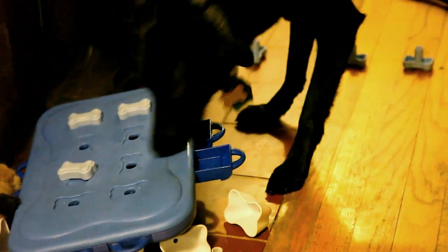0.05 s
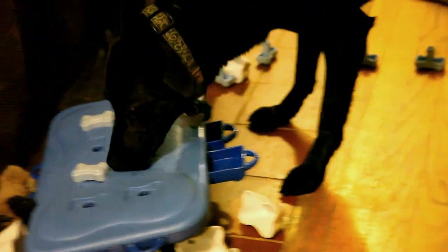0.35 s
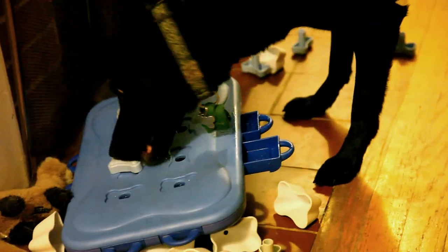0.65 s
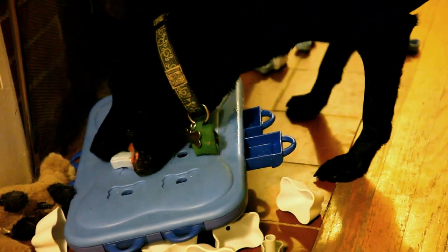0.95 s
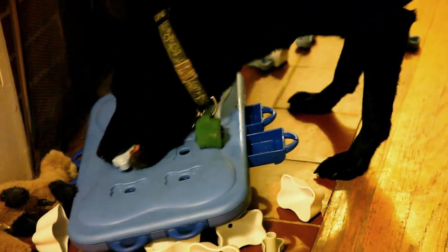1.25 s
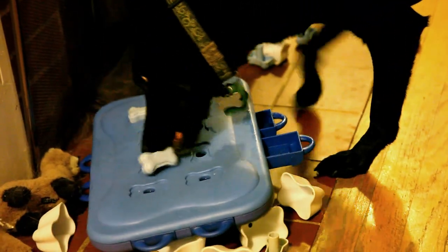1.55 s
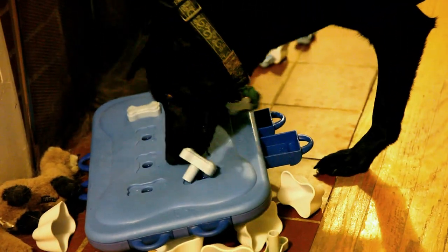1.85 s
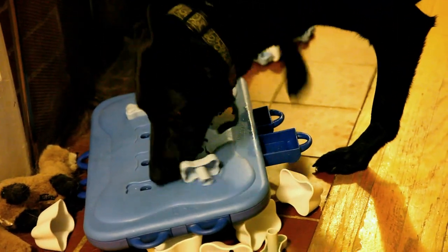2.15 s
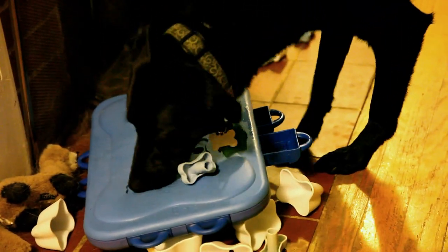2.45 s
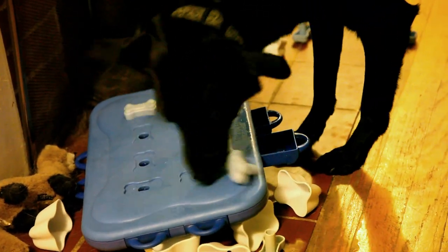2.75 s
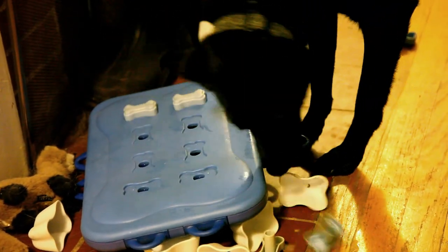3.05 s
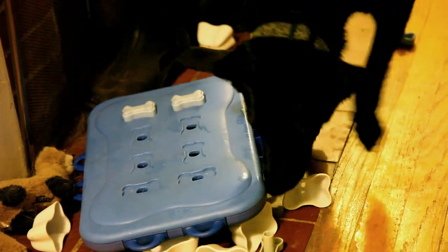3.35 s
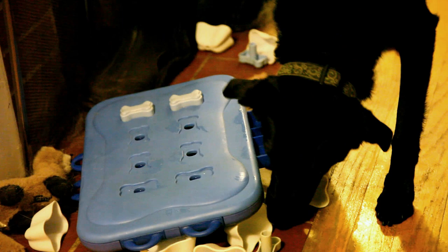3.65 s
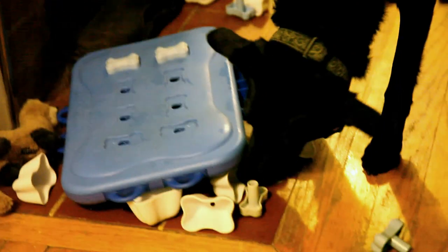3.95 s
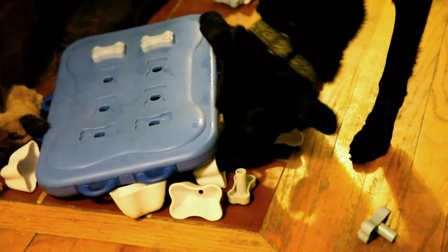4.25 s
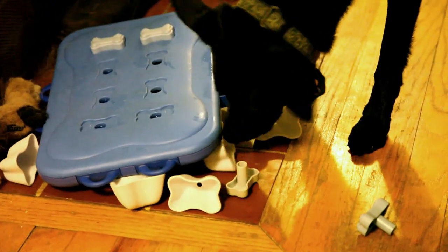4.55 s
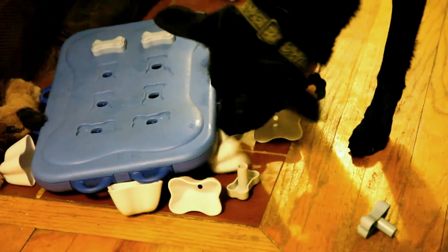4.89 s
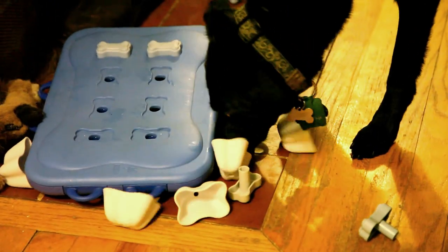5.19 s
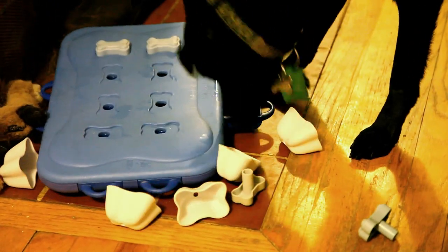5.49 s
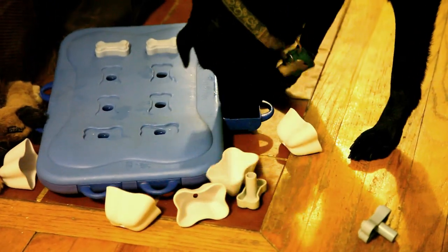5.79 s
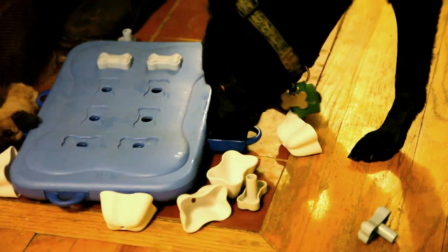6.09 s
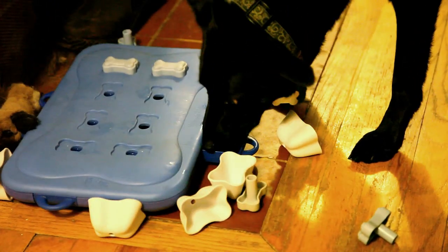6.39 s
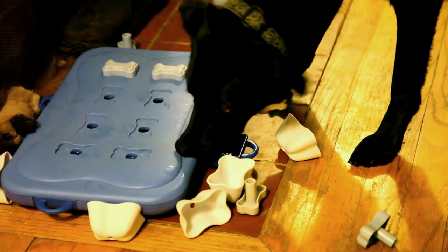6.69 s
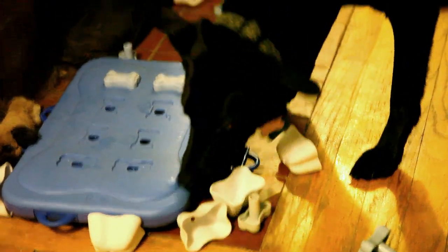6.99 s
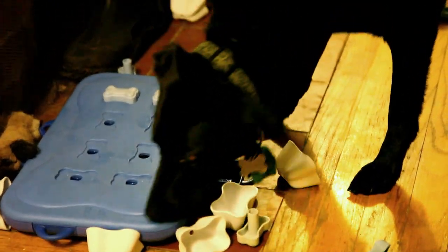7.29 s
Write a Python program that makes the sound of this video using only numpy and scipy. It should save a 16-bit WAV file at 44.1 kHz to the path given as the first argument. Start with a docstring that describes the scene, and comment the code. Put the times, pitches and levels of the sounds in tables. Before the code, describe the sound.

Hard plastic pieces clack, snap and rattle in uneven bursts as a dog pushes a toy tray around indoors, sniffing between shoves.

```python
"""Dog at a treat puzzle

A dog noses a hollow plastic puzzle on a wooden floor in a small room. Loose pieces clack, pegs snap
out, one drops and bounces, the tray thuds and scrapes, a cup judders; the dog sniffs between pushes.
Hiss, motor whirr, hum and a thin whine lie underneath. The gain ducks at the loudest knocks."""
import sys
import numpy as np
from scipy import signal
from scipy.fft import rfft, irfft
from scipy.io import wavfile
from scipy.ndimage import uniform_filter1d

SR = 44100
rng = np.random.default_rng(int(sys.argv[2]) if len(sys.argv) > 2 else 0)


def store_pcm(level_fs):
    """Save levels as 16-bit WAV."""
    pcm = np.round(np.clip(level_fs, -1, 1) * 32767).astype(np.int16)
    wavfile.write(sys.argv[1], SR, np.atleast_2d(pcm).T)


N = 332073
TIME = np.arange(N) / SR

# hollow tray modes: f/Hz, level/dB, t60/s
TRAY_MODES = [(165, -5.5, 0.33), (301.4, -0.5, 0.079), (342, -5.5, .05), (421, 1.5, 0.095),
              (460, -2.5, 0.039), (548, -4.5, 0.04), (601, -6.5, 0.069), (666, 3.5, 0.031),
              (758, -1, 0.052), (828, 6, 0.028), (1008, 0.5, 0.068), (1106, 3, 0.023)]
# peg modes: f/Hz, level/dB, t60/s
PEG_MODES = [(1965, 0.5, 0.0049), (2330, 3, 0.014), (2560, -2.5, 0.016), (3370, -4.5, 0.006)]
# pushes on the tray: start/s, peak/s, end/s, relative level/dB, tilt/(dB/octave)
TRAY_SHOVES = [(0.771,0.825,1.05,-46.5,6.5),(.98,1.15,1.93,-34,-3),(1.548,1.563,1.64,-17,-2.5),(1.622,1.64,1.782,-16.5,-2.5),(1.897,1.955,2.05,-26,-2),(2.22,2.317,2.41,-27,-2),(2.719,2.828,2.97,-29.5,-1),(2.931,3.005,3.01,-27.5,0.5),(4.102,4.201,4.31,-30,-1.5),(4.32,4.384,4.45,-34,-3),(4.454,4.47,4.5,-30,2.5),(4.817,4.841,4.927,-24.5,-4.5),(5.001,5.11,5.37,-31,-2.5),(5.163,5.241,5.42,-21.5,-1),(5.48,5.6,5.77,-33,1),(6.179,6.225,6.29,-15,-1.5),(6.82,6.835,6.85,-38,-10),(7.032,7.068,7.19,-40,3)]


def knocks(ring_cycles=38, chatter=0.29, rebound_db=-13, band_ratio=1.54, room_db=-1):
    """Snap, chatter and a weak rebound ring a piece and thump the tray. Returns direct, room feed."""
    # main contacts: t/s, clack/dB, f/Hz, relative thud/dB, crack/dB
    contacts = [(1.1042,-26.5,2220,-28,-35.5),(1.3716,-23,2420,-38,-32),(1.3867,-22,3150,-26,-33),(1.5546,-19.5,1670,-29,-28),(1.582,-11,1620,-31,-21),(1.627,-9,3520,-11.5,-20),(1.6303,-8,1420,-14.5,-16),(1.695,-11.5,2180,-32,-19.5),(1.8398,-16.5,2180,-23.5,-28),(1.9051,-18,2110,-26,-27.5),(1.9161,-14.5,1260,-31,-40),(1.9878,-16.5,1370,-24.5,-33.5),(2.1196,-15.5,1500,-23,-25),(2.2062,-22.5,1690,-29,-44),(2.2618,-20.5,1310,-29.5,-52),(2.292,-21,2180,-25,-43),(2.7741,-19.5,1754,-28.5,-38),(2.7796,-20,2650,-47,-33),(2.8376,-18.5,1800,-32,-32),(2.9473,-17,2120,-28,-24.5),(3.0004,-18,2000,-28,-37),(3.0375,-7,2990,-31.5,-29),(3.1505,-20,1500,-45,-27),(3.176,-18,3550,-58,-21),(4.103,-37,3570,-55.5,-42),(4.179,-29.5,1361,-30,-55),(4.3865,-33.5,1500,-37,-55),(4.4908,-18,2370,-55,-41),(4.5592,-23,2560,-37,-34),(4.7013,-23.5,2290,-32.5,-30.5),(4.7415,-30.5,3200,-46,-55),(4.7765,-29.5,3180,-38,-46),(4.8122,-21,2975,-31,-30.5),(4.825,-18.5,1670,-25,-34),(5.079,-23.5,1270,-24.5,-49),(5.184,-17,1300,-34,-35),(5.2805,-17.5,1710,-21.5,-30),(5.3008,-9.5,1970,-29.5,-45),(6.0872,-12.5,1690,-31,-42),(6.0935,-8.5,1680,-42,-19),(6.15,-13.5,1960,-25.5,-44),(6.1824,-7,1606,-10.5,-16),(6.2248,-11.5,2514,-15,-19),(6.313,-18,2510,-37,-50),(7.037,-27.5,3030,-46,-42)]
    direct, feed = np.zeros(N), np.zeros(N)
    t = np.arange(SR // 8) / SR
    for start_s, clack_db, hz, thud_db, crack_db in list(contacts) + bounces() + rattles():
        t60 = ring_cycles / hz  # small pieces die sooner
        noise = rng.standard_normal((3, len(t)))
        since_rebound_s = t - rng.uniform(0.0055, 0.02)
        rebound = (since_rebound_s > 0) * from_db(rebound_db - 60 * np.abs(since_rebound_s) / t60)
        fade = from_db(-60 * t / t60) + rebound
        piece_force, tray_force, edge_force = (t == 0) + chatter * noise * fade
        piece = unit_onset(band(piece_force, hz / band_ratio, hz * band_ratio ** 0.8, order=3))
        broad = unit_onset(band(tray_force, 1090, 4260, order=3))
        clack = from_db(clack_db) * unit_onset(piece + from_db(-6) * broad)
        low_hz = np.clip(330 * 2 ** (-(thud_db + 20) / 16), 315, 700)  # heavy blows move lower modes
        tray = band(body(tray_force, TRAY_MODES, spread_db=3.5), low_hz, 1400, order=3)
        sound = clack + from_db(crack_db) * crack(edge_force) + from_db(thud_db - 1) * unit_onset(tray)
        add(direct, start_s, sound)
        add(feed, start_s, from_db(room_db) * sound)
    return direct, feed


def bounces(start_s=3.1622, flight_s=0.0905, restitution=0.835, first_db=-10.5, loss_db=5.5):
    """Knock rows for a dropped peg: one end lands, then the other, ever sooner and weaker."""
    rows = []
    for k in range(6):
        for lag_s, end_db, hz in (0, 0, 3500), (0.025, -4.5, 2600):
            db = first_db - loss_db * k + end_db
            rows.append((start_s + lag_s, db, hz, db - 20, db - 14.5))
        start_s += flight_s * restitution ** k
    return rows


def rattles(rate_per_s=24, centre_hz=1800, spread_octaves=0.59, edge_db=-9, spread_db=3):
    """Knock rows for loose pieces jostled at random, strongest at the peak of each shove."""
    rows = []
    for start_s, peak_s, end_s, shove_db, _ in TRAY_SHOVES:
        for k, (jitter, size, pitch) in enumerate(rng.uniform(-1, 1, (20, 3))):
            at_s = start_s + (k + 0.5 + jitter / 2) / rate_per_s
            swell_db = np.interp(at_s, [start_s, peak_s, end_s], [edge_db, 0, edge_db])
            db = shove_db + swell_db + spread_db * size
            hz = centre_hz * 2 ** (spread_octaves * pitch)
            if at_s < end_s:
                rows.append((at_s, db - 2.5, hz, db - 9, db - 13.5))
    return rows


def peg_snaps(release_s=0.00089, pop=3.5):
    """Stick-slip grows until a peg pops out of its hole. Returns direct, room feed."""
    # t/s, level/dB, build-up/s, crack/dB, room feed/dB
    snaps = [(1.1761, -12, 0.0029, -31, -9), (1.184, -28, 0.00061, -50, -9), (1.209, 0.5, 0.0034, -12, -7),
             (1.2969, -11.5, 0.00087, -35, -14), (1.301, -11.5, .0008, -38, -5.5),
             (1.309, -11.5, .0006, -42, -8)]
    direct, feed = np.zeros(N), np.zeros(N)
    t = np.arange(SR // 20) / SR
    for start_s, db, build_s, crack_db, room_db in snaps:
        grip = np.minimum(t / build_s, 1) * np.exp(-np.maximum(t - build_s, 0) / release_s)
        slips = grip * rng.standard_normal(len(t))
        slips[np.argmax(grip)] += pop
        peg = unit_onset(band(body(slips, PEG_MODES), 1700, 4600))
        sound = from_db(db) * peg + from_db(crack_db) * crack(slips)
        add(direct, start_s, sound)
        add(feed, start_s, from_db(room_db) * sound)
    return direct, feed


def crack(force, skirt_db=-19):
    """Bright edge of a hard contact, with a weak, wider skirt."""
    edge = unit_onset(band(force, 4800, 7600))
    skirt = unit_onset(band(force, 3200, 9100))
    return unit_onset(edge + from_db(skirt_db) * skirt)


def scrapes(slips_per_s=1500, tray_db=-7):
    """Plastic sticks and slips over the boards; the slips also ring the tray."""
    # rubbing plastic: f/Hz, level/dB
    spectrum = [(100, -23), (220, -15), (330, -4), (480, 0), (650, 3.5), (950, 0), (1550, 7.5), (2000, -1),
                (2600, -4), (3500, 0), (4500, -4.5), (7000, -6), (10000, -17.5), (15000, -26)]
    rub = strokes(TRAY_SHOVES, grains(slips_per_s, spread_db=3), spectrum)
    tray = unit_rms(band(body(rub, TRAY_MODES), 223, 2400))
    return rub + from_db(tray_db) * np.std(rub) * tray


def squeals(slips_per_s=2500):
    """A skidding piece judders and rings its high resonances."""
    # start/s, peak/s, end/s, relative level/dB
    skids = [(1.436, 1.54, 1.55, -27.5), (4.44, 4.473, 4.64, -34), (5.229, 5.25, 5.3, -20)]
    # f/Hz, level/dB, t60/s
    modes = [(3550, 7, 0.0058), (3800, -6, 0.0083), (5500, -2, 0.0091), (6300, -12, 0.0047)]
    envelope = sum(from_db(db) * swell(start_s, peak_s, end_s) for start_s, peak_s, end_s, db in skids)
    slips = grains(slips_per_s, spread_db=1.5)
    return envelope * unit_rms(band(body(slips, modes), 3800, 10000))


def peg_creak(slips_per_s=700):
    """A tugged peg sticks and slips in its hole."""
    slips = grains(slips_per_s, spread_db=2)
    return swell(0.94, 1.03, 1.36) * unit_rms(band(body(slips, PEG_MODES), 1900, 4400))


def cup_judder(start_s=6.088, length_s=0.094, start_db=-13.5, fade_db_per_s=150, slips_per_s=900):
    """Quick slips of equal size keep a light cup ringing as it slides and fades."""
    # f/Hz, level/dB, t60/s
    modes = [(988, -15, 0.042), (1427, -2, 0.041), (1544, 0, 0.026), (1626, -6, 0.046), (1825, 0, 0.018)]
    slips = grains(slips_per_s, spread_db=0)
    end_db = start_db - fade_db_per_s * length_s
    level_db = np.interp(TIME - start_s, [0, length_s], [start_db, end_db], left=-200, right=-200)
    return from_db(level_db) * unit_rms(band(body(slips, modes), 900, 2170, order=3))


def sniffs():
    """Puffs of air rush through the dog's nose."""
    # start/s, peak/s, end/s, relative level/dB, tilt/(dB/octave)
    puffs = [(0, .1, 0.55, -46, 1.5), (.155, .175, 0.19, -45, 17), (.75, .8, 0.83, -41.5, -4.5),
             (1.47, 1.55, 1.54, -27.5, 6), (3.758, 3.77, 3.87, -38, 1), (4.09, 4.135, 3.7, -49, 2),
             (4.325, 4.345, 4.47, -35.5, 3.5), (4.955, 4.975, 5.1, -38.5, -2),
             (4.99, 5.055, 5.12, -39.5, 8), (5.21, 5.26, 5.32, -32, 2), (5.5, 5.64, 5.73, -40.5, -1.5),
             (5.77, 5.95, 6, -37, -2.5), (6.0, 6.08, 6.58, -33.5, -1), (6.59, 6.69, 6.77, -25, -1.5)]
    # nasal airflow: f/Hz, level/dB
    spectrum = [(200, -40), (550, -25), (950, -15.5), (1500, 0), (1800, -6), (2300, -8), (3400, -8.5),
                (4500, -7.5), (6800, -10.5), (10000, -22.5), (15000, -41)]
    return strokes(puffs, rng.standard_normal(N), spectrum)


def nose_whistle(centre_hz=5480, width_hz=60, level_db=-58):
    """A nostril whistles faintly and briefly."""
    whistle = band(rng.standard_normal(N), centre_hz - width_hz / 2, centre_hz + width_hz / 2)
    return from_db(level_db) * swell(6.4, 7.0, 7.05) * unit_rms(whistle)


def motor_whirr(flutter_db=3, surge_s=0.0081, tick_db=-19):
    """Motor noise in a few narrow resonances; it flutters, and its surges tick."""
    # f/Hz, level/dB, t60/s
    modes = [(1225, -1, 0.017), (1420, -2.5, 0.011), (2378, -0.5, 0.014), (3034, -11, 0.025),
             (3415, -3.5, 0.017)]
    # t/s, boost/dB
    surges = [(.01, 9), (.113, 5.5), (0.277, 11), (0.58, 7)]
    # slow drift: t/s, relative level/dB
    drift = [(0, 4), (.8, 0.5), (1.5, -1.5), (2.6, -0.5), (3.9, -1.5), (4.7, -1), (6.5, -1.5), (7, 1),
             (7.53, -1)]
    flutter = from_db(flutter_db * unit_rms(band(rng.standard_normal(N), 12.5, 60)))
    surge = from_db(sum(db * np.exp(-((TIME - at_s) / surge_s) ** 2) for at_s, db in surges))
    drive = flutter * rng.standard_normal(N)
    whirr = surge * unit_rms(band(body(drive, modes), 1206, 3320, order=3))
    ticks = from_db(tick_db) * (surge - 1) * unit_rms(band(drive, 2500, 9200))
    return from_db(np.interp(TIME, *np.transpose(drift))) * (whirr + ticks)


def background(hum_hz=64.4, throb_hz=5.4, throb_depth=0.76, whine_hz=15692):
    """Motor whirr, soft hiss, a throbbing low hum and a thin whine."""
    # f/Hz, level/dB
    hiss_spectrum = [(25, -12.5), (100, -2), (220, 0), (430, 2.5), (700, -2), (1000, -2), (1600, 6),
                     (2800, -17), (4100, -6), (7000, -9.5), (10000, -19.5), (15500, -23)]
    hiss = unit_rms(colour(rng.standard_normal(N), hiss_spectrum))
    throb = unit_rms(band(rng.standard_normal(N), throb_hz * 0.95, throb_hz * 1.32, order=1))
    hum = unit_rms((1 + throb_depth * throb) * np.sin(2 * np.pi * hum_hz * TIME))
    whine = unit_rms(np.sin(2 * np.pi * whine_hz * TIME))
    tones = from_db(-60.5) * hum + from_db(-65) * whine
    return from_db(-43.5) * motor_whirr() + from_db(-48) * hiss + tones


def room(x, gap_s=0.0012, build_s=0.0021):
    """Dense echoes build up after a short gap and die away band by band."""
    # f/Hz, t60/s
    decay = [(200, 0.3), (550, 0.43), (1400, 0.39), (3700, 0.27), (10000, 0.3949)]
    # f/Hz, level/dB
    spectrum = [(150, -4.5), (1000, 4), (2500, 1), (6000, 0), (14000, -1)]
    t = np.arange(SR // 2) / SR
    white, hz = rfft(rng.standard_normal(len(t))), np.fft.rfftfreq(len(t), 1 / SR)
    edges_hz, tail = np.geomspace(60, 18000, 12), 0
    for low_hz, high_hz in zip(edges_hz, edges_hz[1:]):
        centre_hz = np.sqrt(low_hz * high_hz)
        noise = irfft(white * (hz >= low_hz) * (hz < high_hz), len(t))
        tail += from_db(at_hz(spectrum, centre_hz) - 60 * t / at_hz(decay, centre_hz)) * noise
    tail *= np.clip((t - gap_s) / build_s, 0, 1)
    return signal.fftconvolve(x, tail / np.sqrt(np.sum(tail ** 2)))[:N]


def gain_control(x, limit_db=-12, attack_s=0.0058, recovery_db_per_s=6):
    """Gain drops quickly above the limit and recovers at a steady rate."""
    level_db = 10 * np.log10(np.maximum(uniform_filter1d(x[0] ** 2, SR // 100), 1e-12))
    excess_db = np.maximum(level_db - limit_db, 0)
    recovered_db = recovery_db_per_s * TIME
    cut_db = np.maximum.accumulate(excess_db + recovered_db) - recovered_db
    pole = np.exp(-1 / (attack_s * SR))
    return x * from_db(-signal.lfilter([1 - pole], [1, -pole], cut_db))


def strokes(table, source, spectrum, ripple_db=2.5):
    """Swells of up to 0.5 s, each with its own tilt and the chance resonances of the gap it sounds in."""
    out, hz = np.zeros(N), np.geomspace(300, 15000, 60)
    for start_s, peak_s, end_s, db, tilt in table:
        first = max(round(start_s * SR), 0)
        part = slice(first, first + SR // 2)
        gap_db = ripple_db * rng.standard_normal(len(hz)) * np.minimum(hz / 3000, 1)
        sound = colour(colour(source[part], spectrum, tilt), np.c_[hz, gap_db])
        out[part] += from_db(db) * swell(start_s, peak_s, end_s)[part] * unit_rms(sound)
    return out


def grains(rate_per_s, spread_db):
    """Tiny slips: clicks at random times."""
    slips = rng.random(N) < rate_per_s / SR
    sizes = from_db(spread_db * np.minimum(rng.exponential(1, N), 4))
    return slips * sizes * rng.choice([-1, 1], N)


def body(force, modes, spread_db=0):
    """An object's modes in alternating polarity; their strengths scatter by spread_db."""
    return sum(from_db(db + spread_db * rng.normal()) * (-1) ** k * ring(force, hz, t60)
               for k, (hz, db, t60) in enumerate(modes))


def ring(force, hz, t60):
    """One damped mode; small bodies radiate no bass."""
    radius, angle = from_db(-60 / (t60 * SR)), 2 * np.pi * hz / SR
    return signal.lfilter([0.5, 0, -0.5], [1, -2 * radius * np.cos(angle), radius ** 2], force + 1e-18)


def colour(x, spectrum, db_per_octave=0):
    """Impose a spectrum, tilted above 300 Hz."""
    hz = np.fft.rfftfreq(len(x), 1 / SR)
    gain_db = at_hz(spectrum, hz) + db_per_octave * np.log2(np.maximum(hz, 300))
    return irfft(rfft(x) * from_db(gain_db), len(x))


def at_hz(table, hz):
    """Interpolate on a log-frequency axis."""
    table_hz, values = np.transpose(table)
    return np.interp(np.log(np.maximum(hz, 1)), np.log(table_hz), values)


def band(x, low_hz, high_hz, order=2):
    """Causal band-pass."""
    return signal.sosfilt(signal.butter(order, [low_hz, high_hz], "band", fs=SR, output="sos"), x)


def swell(start_s, peak_s, end_s):
    """Triangular envelope."""
    return np.interp(TIME, [start_s, peak_s, end_s], [0, 1, 0])


def add(out, start_s, sound):
    """Mix in at start_s."""
    first = max(round(start_s * SR), 0)
    out[first:first + len(sound)] += sound[:max(N - first, 0)]


def unit_onset(x):
    """Scale to rms 1 over the first 10 ms."""
    return x / np.sqrt(np.mean(x[:SR // 100] ** 2) + 1e-20)


def unit_rms(x):
    """Scale to rms 1."""
    return x / np.sqrt(np.mean(x ** 2) + 1e-20)


def from_db(db):
    """Decibels to gain."""
    return 10 ** (np.asarray(db) / 20)


def scene(knock_room_db=-6.5, soft_room_db=-6):
    """Puzzle and dog in the room, over the background; mono."""
    hard, hard_feed = np.add(knocks(), peg_snaps())
    friction = scrapes() + squeals() + from_db(-39) * peg_creak()
    soft = from_db(-3) * friction + cup_judder() + nose_whistle() + from_db(-1) * sniffs()
    echoes = room(from_db(knock_room_db) * hard_feed + from_db(soft_room_db) * soft)
    return (hard + soft + echoes + background())[None]


def record(dry, cutoff_hz=16100):
    """Microphone colour, gain ducking, soft overload of the peaks, steep low-pass."""
    # microphone peaks and dips: f/Hz, width/Hz, gain/dB
    microphone = [(596, 150, 0.5), (2465, 930, -3.5), (3480, 830, 3), (4900, 670, -1), (6700, 440, 1.5),
                  (13600, 3000, -3.5)]
    for hz, width_hz, db in microphone:
        resonance = signal.lfilter(*signal.iirpeak(hz, hz / width_hz, fs=SR), dry)
        dry = dry + (from_db(db) - 1) * resonance
    ducked = gain_control(dry)
    clipped = ducked / (1 + ducked ** 6) ** (1 / 6)
    return signal.sosfilt(signal.ellip(10, 0.1, 70, cutoff_hz, fs=SR, output="sos"), clipped)


dry = scene()
out = record(dry)
store_pcm(out)
```